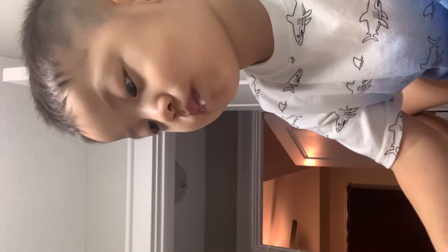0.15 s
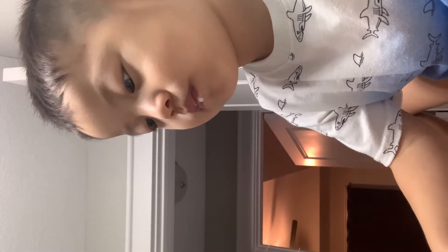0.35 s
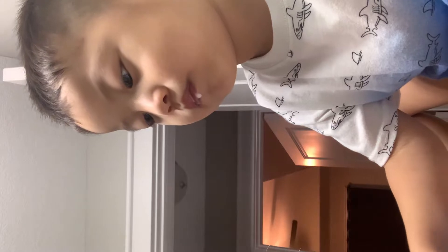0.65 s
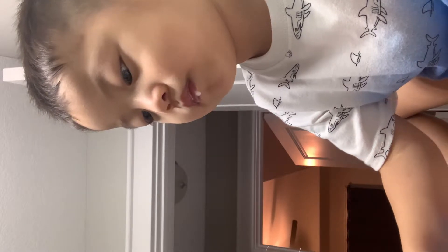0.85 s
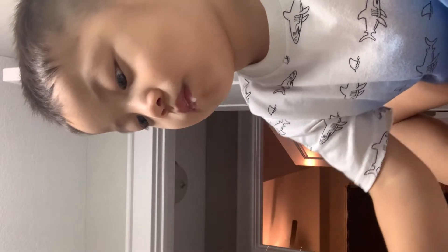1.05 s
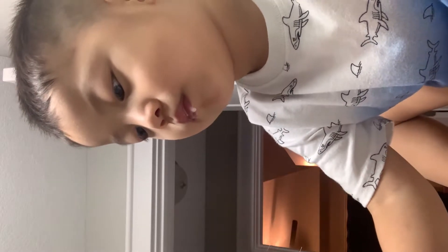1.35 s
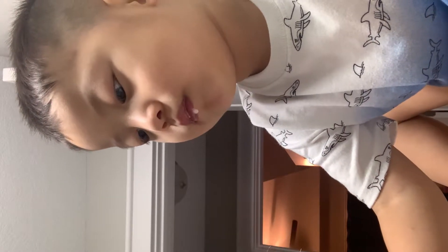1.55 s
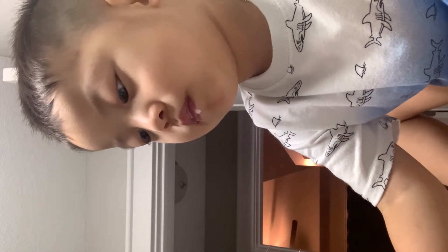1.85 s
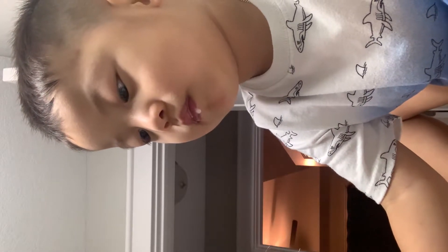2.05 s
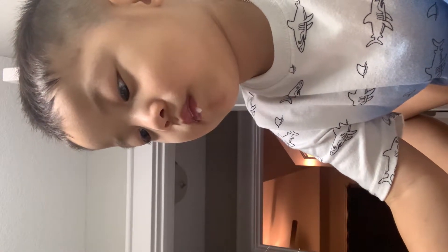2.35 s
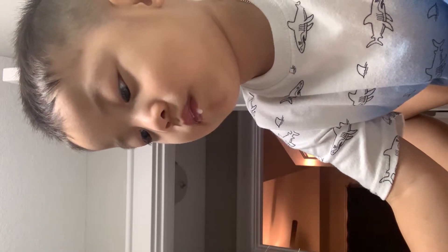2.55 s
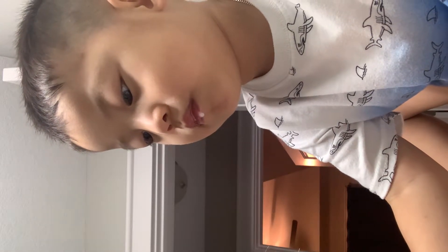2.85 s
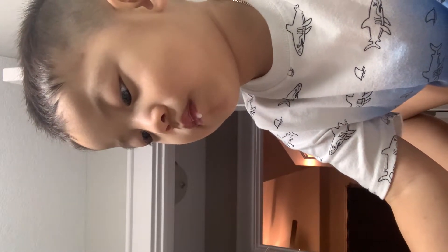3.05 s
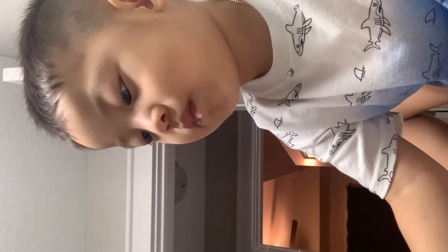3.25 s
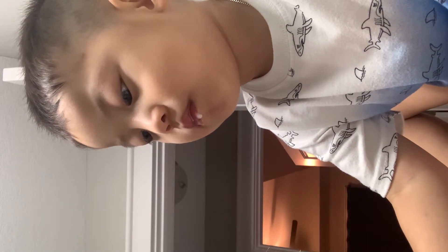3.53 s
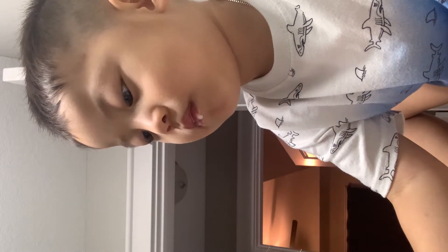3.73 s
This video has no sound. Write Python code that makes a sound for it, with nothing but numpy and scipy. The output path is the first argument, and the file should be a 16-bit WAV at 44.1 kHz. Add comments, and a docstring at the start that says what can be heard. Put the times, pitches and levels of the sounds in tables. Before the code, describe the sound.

Tap water runs steadily into a sink, hissing and pattering with scattered sharp splats and plops

```python
"""A tap runs into a sink in a small, hard room: its jet hisses as dense filtered noise and impacts.
Its drops patter on the basin, burble, fizz and slosh in the pool, and make the bowl drum.
Now and then the stream is disturbed: it gurgles, throws sharp splats, plops and plunks as short rings
and bursts, and thumps on the bowl, whose low modes ring. Twice a faint low hum rises under the water.
Direct sound and a diffuse room answer give the stereo picture, a little way off."""
import sys
import numpy as np
from scipy import signal
from scipy.fft import rfft, irfft, next_fast_len
from scipy.io import wavfile
from scipy.ndimage import uniform_filter1d, map_coordinates

SR = 44100
rng = np.random.default_rng(int(sys.argv[2]) if len(sys.argv) > 2 else 0)


def generate_wav(signal):
    """Clip the signal to [-1, 1] and save it as 16-bit WAV at the path in sys.argv[1]."""
    frames = np.transpose(np.atleast_2d(signal))
    scaled = np.clip(frames, -1, 1) * 32767
    pcm = np.round(scaled).astype(np.int16)
    wavfile.write(sys.argv[1], SR, pcm)


N = 171549  # length in samples

# Event and stream levels below are taken before the trims further down.
# Strength of the stream's three voices: start_s, hiss_db, burble_db, patter_db
STREAM_LEVELS = [(0.0, -40, -36, -43.5), (0.12, -37.5, -37, -41), (0.35, -39, -39.5, -45),
                 (0.48, -36.5, -34, -40), (0.66, -36.5, -37, -39), (1.03, -35, -36, -42),
                 (1.53, -36, -40.5, -40.5), (1.565, -33.5, -33.5, -34), (1.61, -34, -31, -37),
                 (1.67, -36, -38, -38.5), (1.98, -37, -36.5, -43), (2.76, -37, -37, -41.5),
                 (2.78, -37.5, -31, -40.5), (3.08, -36, -38, -42), (3.11, -36, -32.5, -34.5),
                 (3.15, -37.5, -37, -43.5), (3.49, -35, -36.5, -39.5), (3.76, -38.5, -36.5, -44.5),
                 (3.89, -41.5, -39, -47.5)]
# Level of the pool's low sloshing: start_s, level_db
SLOSH_LEVELS = [(0, -42), (.42, -46.5), (.6, -47.5), (1.5, -46), (1.6, -41.5), (1.75, -43.5), (2.8, -46.5),
                (3.24, -44.5), (3.34, -38.5), (3.88, -41.5)]

# Tone colours, shape only: frequency_hz, relative_level_db (per Hz)
HISS_SPECTRUM = [(2200, -32), (4500, -11), (6500, -5.5), (7700, -4), (8550, 1.5), (8900, -2), (10700, -2.5),
                 (11100, -1), (12000, -1.8), (12600, 1.5), (13100, -2.5), (13400, -1.5), (14300, -6.5),
                 (15700, -8)]
PATTER_SPECTRUM = [(1200, -25), (2280, -3), (2720, 1), (3080, -2), (3450, 1.5), (4200, -2), (5000, -5),
                   (5500, 0.5), (6250, -5), (7200, -18.5), (11000, -20.5)]
BURBLE_SPECTRUM = [(700, -32), (1110, -17), (1380, -10), (1580, -4), (1730, -14.5), (1850, -7), (2130, -13),
                   (2270, -25), (3500, -41.5)]
SLOSH_SPECTRUM = [(250, -31), (390, -13), (470, -3.5), (560, -9), (680, 1), (920, -3), (1100, -1),
                  (1230, -5.5), (2000, -27.5)]
GURGLE_SPECTRUM = [(300, -33), (420, -10.5), (500, -0.5), (590, -10.5), (700, 5), (810, -10.5), (920, -6.5),
                   (1200, -11), (2000, -18.5)]
DRUM_SPECTRUM = [(20, -81), (45, -21), (80, -10.5), (110, -5.5), (138, -4), (165, 3.5), (188, -6.5),
                 (245, -6), (290, -14.5), (350, -25.5), (700, -29)]
SPRAY_SPECTRUM = [(1100, -16), (1900, -3), (2280, -6), (2900, 3), (3600, 7), (4400, 7), (5300, 4),
                  (6200, 3), (8000, -4), (10500, -5), (14000, -18)]

# Sharp splats of water on the basin: start_s, level_db, pitch_hz
SPLAT_EVENTS = [(.049, -27, 3650), (.0762, -25, 4200), (.1281, -20.5, 3980), (.4653, -18, 3650),
                (.5053, -22, 3640), (.5651, -24, 4400), (.5816, -14.5, 3540), (.649, -25, 8500),
                (.6674, -20.5, 3200), (.6978, -16.5, 3900), (.7352, -18.5, 3500), (.738, -23, 5700),
                (.7627, -22, 3100), (.8055, -19, 3100), (.8072, -14.5, 6600), (.8152, -18.5, 6600),
                (.837, -22, 6320), (1.1303, -25, 3690), (1.5404, -19, 3320), (1.5625, -20.5, 3950),
                (1.568, -19, 3400), (1.6222, -15.5, 3700), (1.7778, -24, 3700), (1.78, -23, 6300),
                (2.0487, -26, 3530), (2.1435, -25, 3600), (2.607, -13.5, 3400), (2.6574, -22, 3730),
                (3.044, -19.5, 4420), (3.069, -23, 3400), (3.128, -21, 3300), (3.2111, -25, 9400),
                (3.2445, -21, 9900), (3.3199, -22, 3600), (3.333, -22.5, 3600), (3.347, -24, 3600),
                (3.3872, -10.5, 3400), (3.4435, -18, 3740), (3.446, -23, 7600), (3.5867, -17, 3450),
                (3.6396, -18.5, 4020)]
# Larger bubbles in the pooled water: start_s, level_db, starting pitch_hz
PLOP_EVENTS = [(0.4578, -19.5, 1580), (0.6663, -21, 1870), (0.698, -21, 1880), (1.5828, -21, 1750),
               (1.598, -18.5, 1660), (1.612, -26, 1800), (1.785, -23, 1490), (2.7788, -18, 1560),
               (2.7926, -12.5, 1540), (2.821, -21, 1570), (2.8574, -20, 1870), (3.1028, -17.5, 1810)]
# Fat drops plunking into the pool: start_s, level_db
PLUNK_EVENTS = [(0.296, -25), (0.371, -28), (0.44, -31), (0.786, -30), (0.932, -30), (0.994, -31),
                (1.038, -28), (1.251, -32), (1.371, -32), (1.417, -28), (1.784, -30), (2.385, -31),
                (2.474, -30), (2.955, -28.5), (3.045, -28.5), (3.278, -30)]
# Gobs of water thumping on the bowl: start_s, level_db, extra top_mode_db
THUMP_EVENTS = [(0.201, -40, 9), (1.622, -27.5, -9), (1.672, -33, 10.5), (1.699, -26, -1),
                (1.784, -36, 6.5), (1.824, -29.5, -7), (1.876, -20, 3.5), (1.928, -31, 5.5),
                (3.273, -26.5, -3.5), (3.344, -25.5, 7), (3.574, -25.5, -7)]
# Ringing modes of the bowl, highest last: pitch_hz, level_db, t60_s
BOWL_MODES = [(99.4, -18, 0.55), (141.7, 4.5, 0.094), (247, -2.5, 0.13)]
# Runs of gurgling: start_s, length_s, level_db
GURGLE_EVENTS = [(0.285, 0.122, -35), (3.28, 0.018, -36)]
# Faint low hums: start_s, length_s, level_db, pitch_hz
HUM_EVENTS = [(2.54, 0.19, -49.5, 362), (3.557, .07, -46.5, 362)]

# Phase of left ahead of right in the direct sound: frequency_hz, lead_rad
LEFT_LEAD = [(150, 0), (260, .3), (600, .5), (950, 2.2), (1200, 3.4), (1500, 6.1), (1800, 4.8), (2150, 4.7),
             (2400, 2.4), (2700, 3.3), (2980, 3.2), (3350, 4.3), (3750, 4.8), (4500, 3), (5200, 3),
             (6100, 2.2), (7000, -.7), (8500, -1), (12950, -2.65), (13200, -3.14)]
# Share of the power that is direct, the rest diffuse: frequency_hz, share (0-1)
DIRECT_SHARE = [(200, .98), (280, .9), (430, .3), (800, .7), (1250, .5), (1900, .76), (2300, .3),
                (2950, .88), (3500, .65), (4100, .35), (4800, .9), (6500, .3), (7600, .45), (8300, .82),
                (12000, .8), (12950, .88), (13200, 1)]
# Left level minus right level: frequency_hz, difference_db
LEFT_BALANCE = [(200, 1.1), (550, 4), (800, -1), (1250, 1), (1650, -0.5), (3400, 1), (9000, 0)]
# Decay of the room's tail: frequency_hz, t60_s
ROOM_DECAY = [(200, 0.28), (2000, 0.14), (12000, 0.07)]

# Level trims of the stream's voices; the drum's is its whole level
HISS_DB, BURBLE_DB, PATTER_DB, DRUM_DB = 3.5, -0.5, 5.5, -42
# Bubble fizz: centre pitch, spread of pitch and level, cycles to fall 60 dB
FIZZ_HZ, FIZZ_OCTAVES, FIZZ_SPREAD_DB, FIZZ_CYCLES = 4010, 0.47, 9, 17.5
# The hiss and patter drop while the water gurgles
GURGLE_EDGE_S, GURGLE_DUCK_DB = 0.015, 3.5

SPLAT_DB, SPLAT_T60_S, SPLAT_ATTACK_S = 10.5, 0.011, 0.0013
# Droplets per splat, latest delay, full range of detuning
SPLAT_DROPLETS, SPLAT_SCATTER_S, SPLAT_OCTAVES = 6, 0.004, 1.0
SPRAY_DB, SPRAY_T60_S, SPRAY_ATTACK_S = -4.5, 0.019, 0.0012
# Splats fly up out of the bowl, so they sound drier than the stream
SPLAT_ROOM_DB = -4

PLOP_DB, PLOP_T60_S, PLOP_ATTACK_S = 5.5, 0.024, 0.0016
BUBBLE_RISE_PER_S = 6.2  # pitch climbs by twice this fraction a second
PLUNK_DB, PLUNK_T60_S = -3.5, 0.036
THUMP_DB, THUMP_ATTACK_S, BOWL_LOW_HZ, BOWL_HIGH_HZ = 1, 0.005, 79, 340
HUM_WAVER_RAD = 0.27

NEAR_WALLS_DB, NEAR_WALLS_T60_S = 0.5, 0.022  # level against the start of the tail
WANDER_PER_S = 25  # how fast the points of impact, and so the echo paths, shift
TOP_HZ = 15750


def amp(db):
    """Turn decibels into gain."""
    return 10 ** (np.asarray(db) / 20)


def unit(x):
    """Scale to rms 1."""
    return x / np.sqrt(np.mean(x ** 2) + 1e-20)


def fade(t, t60):
    """Decay exponentially, by 60 dB in t60 seconds."""
    return amp(-60 * t / t60)


def along(points, hz):
    """Read a (Hz, value) curve on a log frequency axis."""
    f, v = np.transpose(points)
    return np.interp(np.log(hz + 1), np.log(f + 1), v)


def curves(rows):
    """Draw one value per sample for each column after the time."""
    s, *columns = np.transpose(rows)
    return [np.interp(np.arange(N) / SR, s, c) for c in columns]


def wobble(rate):
    """Draw a smooth random curve with rate knots a second."""
    return map_coordinates(rng.standard_normal(2048), [np.arange(N) * rate / SR], mode="wrap")


def gate(s, length):
    """Open to 1 for a length of time, with short ramps outside it."""
    corners = [s - GURGLE_EDGE_S, s, s + length, s + length + GURGLE_EDGE_S]
    return np.interp(np.arange(N) / SR, corners, [0, 1, 1, 0])


def add(track, s, sound):
    """Mix a sound into the track at s seconds."""
    part = track[round(s * SR):][:len(sound)]
    part += sound[:len(part)]


def filtered(x, response):
    """Multiply the sound's spectrum by a response of frequency."""
    m = next_fast_len(N + SR // 2)
    return irfft(rfft(x, m) * response(np.fft.rfftfreq(m, 1 / SR)), m)[..., :N]


def coloured(x, spectrum):
    """Ring x through a causal, minimum-phase filter with this spectrum, at rms 1."""
    size = 8192
    gain = amp(along(spectrum, np.fft.rfftfreq(size, 1 / SR)))
    cepstrum = irfft(np.log(gain))
    # Folding the cepstrum forward puts the ringing after each impact
    cepstrum[1:size // 2] *= 2
    cepstrum[size // 2 + 1:] = 0
    impulse = irfft(np.exp(rfft(cepstrum)))
    return unit(signal.fftconvolve(x, impulse)[:N])


def drops(spectrum, rate, spread_db, wash_db):
    """Colour random impacts of uneven size, rate a second, over a wash of countless tiny ones."""
    sizes = amp(spread_db * np.clip(rng.standard_normal(N), -2, 2)) * rng.choice([-1, 1], N)
    impacts = unit(sizes * (rng.random(N) < rate / SR))
    wash = amp(wash_db) * rng.standard_normal(N)
    return coloured(impacts + wash, spectrum)


def ring(t, hz, t60, attack, rise=0):
    """Sound a damped tone whose pitch may rise."""
    t = np.maximum(t, 0)
    tone = np.sin(2 * np.pi * hz * t * (1 + rise * t))
    return tone * fade(t, t60) * (1 - np.exp(-t / attack))


def room(x):
    """Answer diffusely in each channel: a burst from the near walls, then the room's tail."""
    hz, t, z = signal.stft(rng.standard_normal((2, SR // 2)), SR, nperseg=256)
    tail_decay = fade(t, along(ROOM_DECAY, hz)[:, None])
    z = z * (tail_decay + amp(NEAR_WALLS_DB) * fade(t, NEAR_WALLS_T60_S))
    # Even out the energy across frequency
    energy = np.sum(abs(z) ** 2, axis=2, keepdims=True)
    z = z / np.sqrt(uniform_filter1d(energy, size=2, axis=1))
    tail = signal.istft(z, SR, nperseg=256)[1]
    tail = tail / np.linalg.norm(tail, axis=1, keepdims=True)
    tail = np.pad(tail, ((0, 0), (SR // 700, 0)))  # a short gap before the first echo
    return signal.fftconvolve(x[None], tail, axes=1)[:, :N]


def wandering_room(x, count):
    """Land the water on ever different spots, each with its own echo."""
    weights = np.array([wobble(WANDER_PER_S) for spot in range(count)])
    weights = weights / np.linalg.norm(weights, axis=0)
    return sum(room(x * w) for w in weights)


def hums():
    """A faint, slightly unsteady low sine comes and goes under the water."""
    out, t = np.zeros(N), np.arange(N) / SR
    for s, length, db, hz in HUM_EVENTS:
        phase = 2 * np.pi * hz * t + HUM_WAVER_RAD * wobble(30)
        out += amp(db) * gate(s, length) * np.sin(phase)
    return out


def thumps():
    """Heavy gobs ring the bowl's low modes; where one lands sets how strongly the top mode answers."""
    out, t = np.zeros(N), np.arange(SR // 2) / SR
    *lower, top = [amp(db) * ring(t, hz, t60, THUMP_ATTACK_S) for hz, db, t60 in BOWL_MODES]
    for s, db, top_db in THUMP_EVENTS:
        add(out, s, amp(db + THUMP_DB) * (sum(lower) + amp(top_db) * top))
    band = signal.butter(2, [BOWL_LOW_HZ, BOWL_HIGH_HZ], "band", fs=SR, output="sos")
    return signal.sosfilt(band, out)


def gurgles():
    """Low bubbles crowd into short, hollow runs of noise and impacts."""
    level = sum(amp(db) * gate(s, length) for s, length, db in GURGLE_EVENTS)
    return level * drops(GURGLE_SPECTRUM, rate=1100, spread_db=-3.0, wash_db=0)


def plunks():
    """Fat drops stir the pool in short, dull bursts of slosh-coloured noise."""
    level, t = np.zeros(N), np.arange(SR // 10) / SR
    for s, db in PLUNK_EVENTS:
        add(level, s, amp(db + PLUNK_DB) * fade(t, PLUNK_T60_S))
    return level * drops(SLOSH_SPECTRUM, rate=2900, spread_db=11.0, wash_db=8)


def plops():
    """Larger bubbles ring briefly and rise in pitch."""
    out, t = np.zeros(N), np.arange(SR // 10) / SR
    for s, db, hz in PLOP_EVENTS:
        bubble = ring(t, hz, PLOP_T60_S, PLOP_ATTACK_S, BUBBLE_RISE_PER_S)
        add(out, s, amp(db + PLOP_DB) * bubble)
    return out


def splats():
    """Each splat is a snapping bubble, a few droplets just behind it and a puff of spray."""
    out, puffs, t = np.zeros(N), np.zeros(N), np.arange(SR // 10) / SR
    puff = fade(t, SPRAY_T60_S) * (1 - np.exp(-t / SPRAY_ATTACK_S))
    for s, db, hz in SPLAT_EVENTS:
        snap = ring(t, hz, SPLAT_T60_S, SPLAT_ATTACK_S)
        for late, size, detune in rng.random((SPLAT_DROPLETS, 3)):
            droplet_hz = hz * 2 ** (SPLAT_OCTAVES * (detune - 0.5))
            droplet_t = t - late * SPLAT_SCATTER_S
            droplet = ring(droplet_t, droplet_hz, SPLAT_T60_S / 2, SPLAT_ATTACK_S / 2)
            snap = snap + amp(0.5 - 8.0 * size) * droplet
        add(out, s, amp(db + SPLAT_DB) * snap)
        add(puffs, s, amp(db + SPRAY_DB) * puff)
    return out + puffs * drops(SPRAY_SPECTRUM, rate=2400, spread_db=-25.0, wash_db=0)


def fizz(count):
    """Small bubbles are born at random, each ringing a few cycles at its own rising pitch."""
    out, t = np.zeros(N), np.arange(SR // 40) / SR
    births = rng.random(count) * N / SR
    traits = np.clip(rng.standard_normal((count, 2)), -2, 2)
    for s, (pitch, size) in zip(births, traits):
        hz = FIZZ_HZ * 2 ** (FIZZ_OCTAVES * pitch)
        bubble = ring(t, hz, FIZZ_CYCLES / hz, attack=1 / hz, rise=BUBBLE_RISE_PER_S)
        add(out, s, amp(FIZZ_SPREAD_DB * size) * bubble)
    return unit(out)


def stream():
    """The jet hisses and drives drops into basin and pool, its voices fluttering with the flow."""
    hiss_db, burble_db, patter_db = curves(STREAM_LEVELS)
    slosh_db, = curves(SLOSH_LEVELS)
    flutter = wobble(70)
    duck_db = GURGLE_DUCK_DB * sum(gate(s, length) for s, length, db in GURGLE_EVENTS)

    hiss_gain = amp(hiss_db + HISS_DB - duck_db + 0.71 * flutter + 1.44 * wobble(220))
    hiss = hiss_gain * drops(HISS_SPECTRUM, rate=4900, spread_db=5, wash_db=3.5)

    patter_gain = amp(patter_db + PATTER_DB - duck_db + 0.26 * flutter + 2.2 * wobble(110))
    patter = patter_gain * drops(PATTER_SPECTRUM, rate=1000, spread_db=2.0, wash_db=-3.5)

    burble_gain = amp(burble_db + BURBLE_DB + 0.13 * flutter)
    burble = burble_gain * drops(BURBLE_SPECTRUM, rate=700, spread_db=0.5, wash_db=-3.0)

    slosh = amp(slosh_db) * drops(SLOSH_SPECTRUM, rate=300, spread_db=2.5, wash_db=-3.5)

    drum_gain = amp(DRUM_DB + 0.12 * wobble(3.72))
    drum = drum_gain * drops(DRUM_SPECTRUM, rate=370, spread_db=0.0, wash_db=-3.5)

    bubbles = amp(patter_db - duck_db) * fizz(count=900)
    return hiss + patter + burble + slosh + drum + bubbles


def scene():
    """Carry the sink to left and right directly and by way of the room."""
    bowl = hums() + thumps() + gurgles() + plunks() + plops() + stream()
    thrown = splats()
    sides = np.array([[0.5], [-0.5]])  # left, right

    def share(hz):
        """Read the direct share of the power, held within 0 to 1."""
        return np.clip(along(DIRECT_SHARE, hz), 0, 1)

    def direct_path(hz):
        """Split the phase lead evenly between the two channels."""
        return np.sqrt(share(hz)) * np.exp(1j * sides * along(LEFT_LEAD, hz))

    direct = filtered(bowl + thrown, direct_path)
    echoes = wandering_room(bowl + amp(SPLAT_ROOM_DB) * thrown, count=8)
    diffuse = filtered(echoes, lambda hz: np.sqrt(1 - share(hz)))
    return filtered(direct + diffuse, lambda hz: amp(sides * along(LEFT_BALANCE, hz)))


def record(dry):
    """Keep nothing above the band limit."""
    return filtered(dry, lambda hz: hz < TOP_HZ)


dry = scene()
out = record(dry)
generate_wav(out)
```